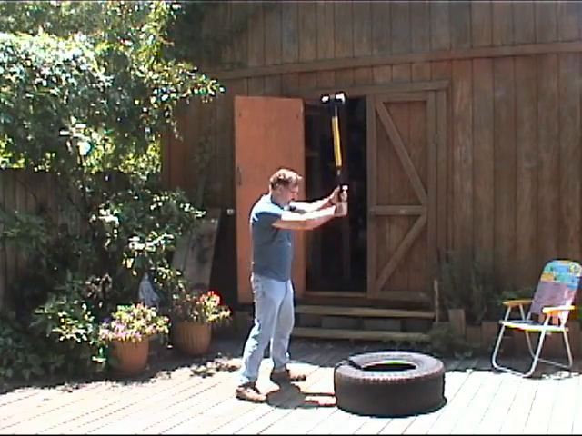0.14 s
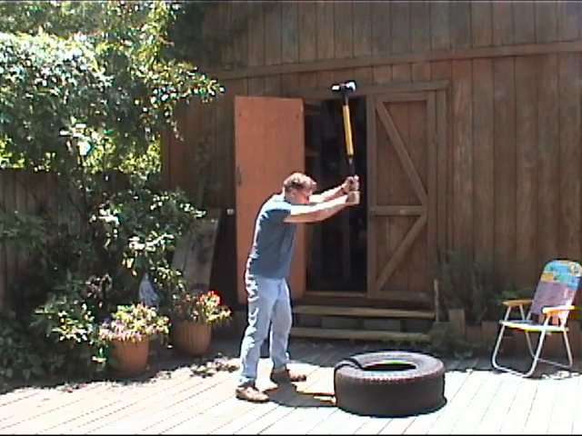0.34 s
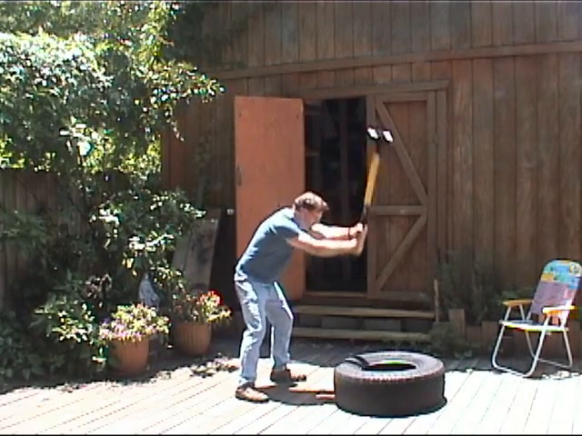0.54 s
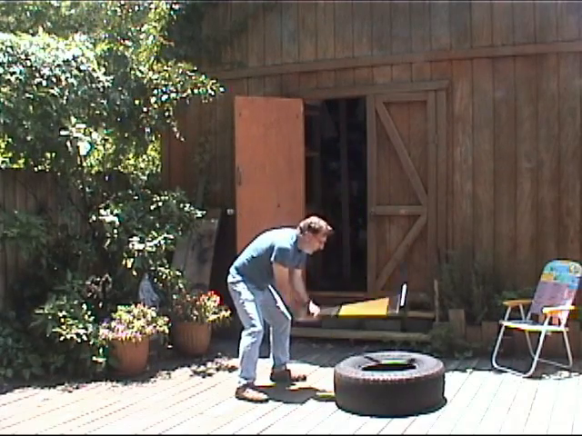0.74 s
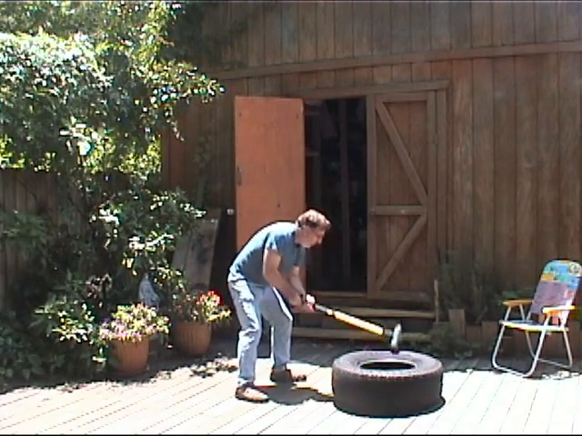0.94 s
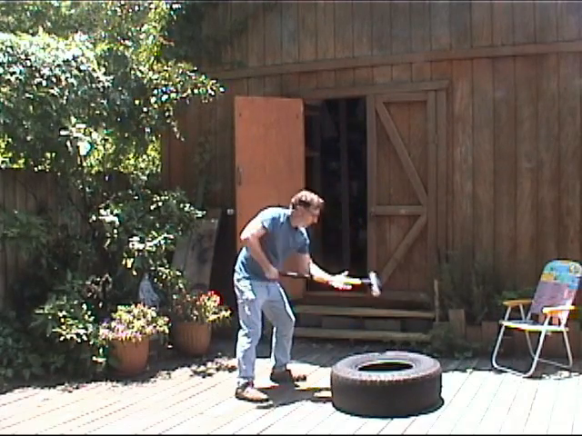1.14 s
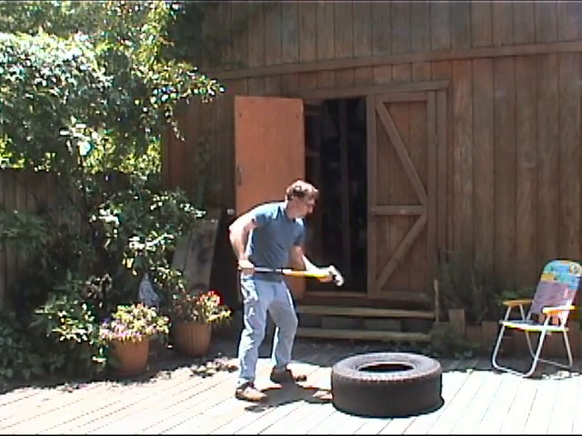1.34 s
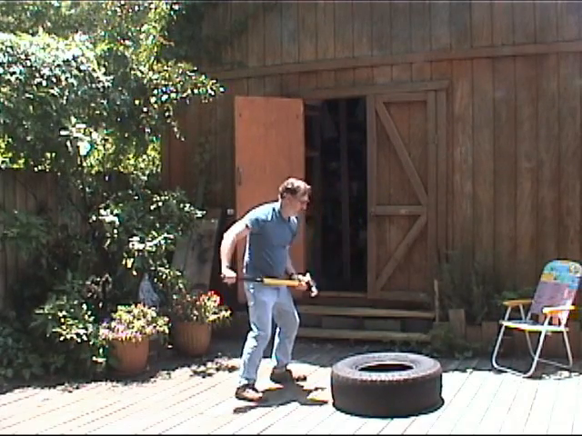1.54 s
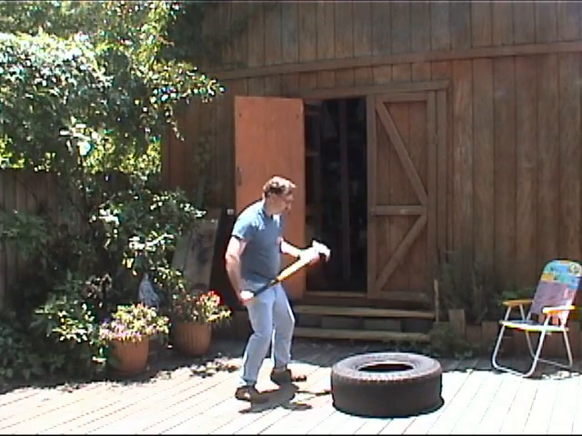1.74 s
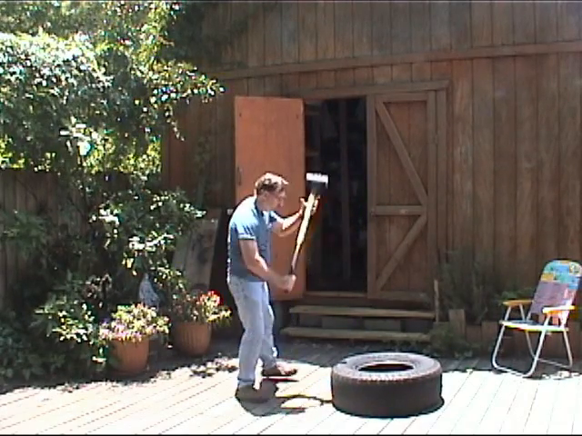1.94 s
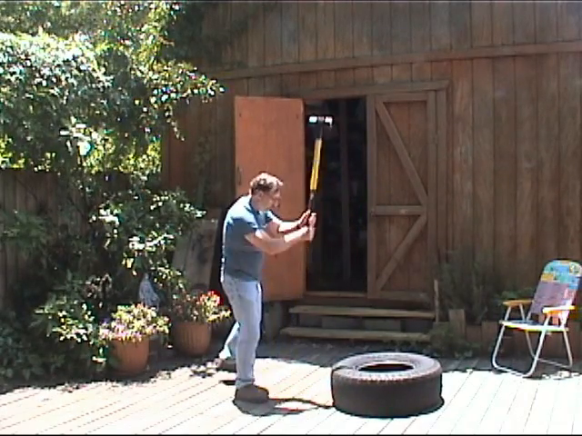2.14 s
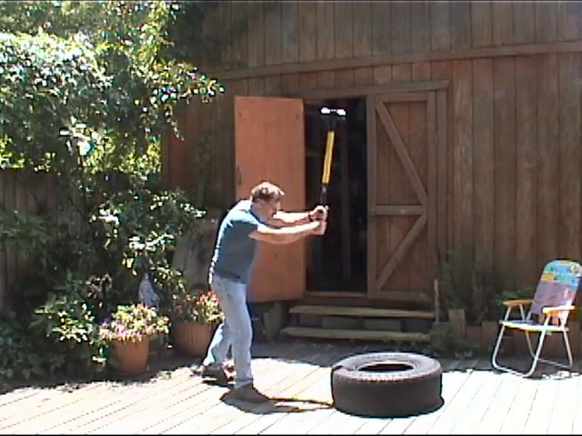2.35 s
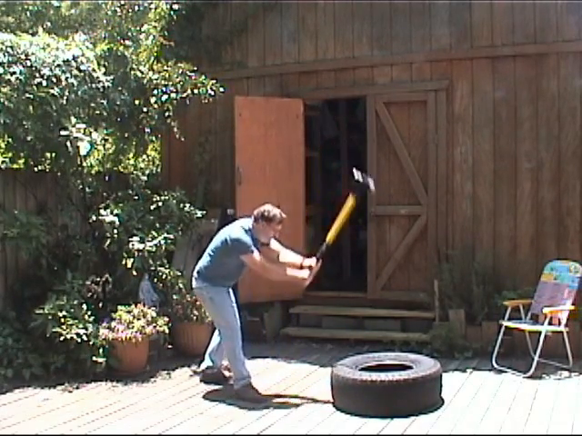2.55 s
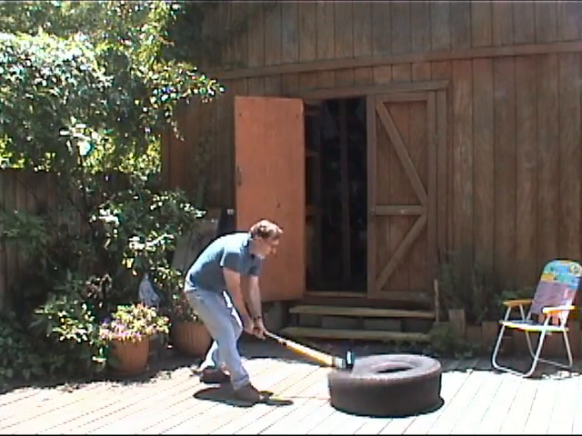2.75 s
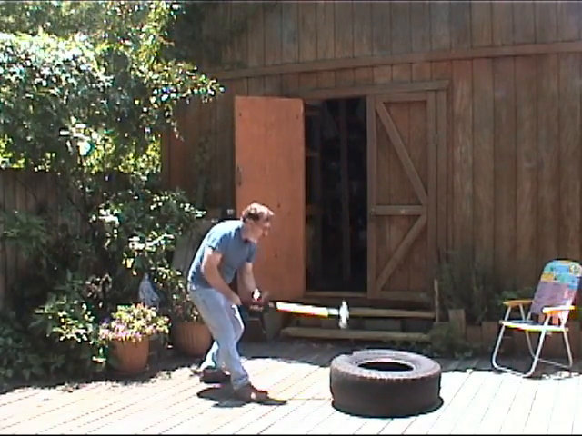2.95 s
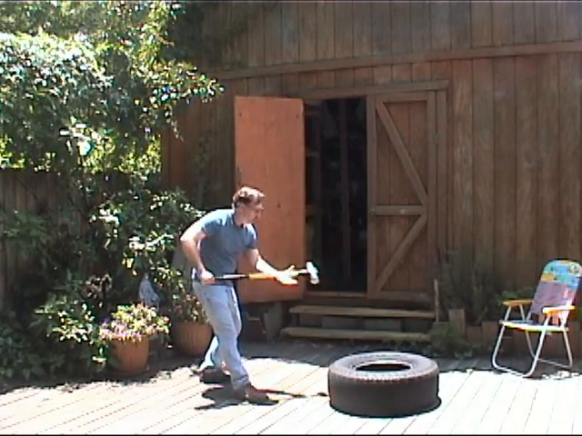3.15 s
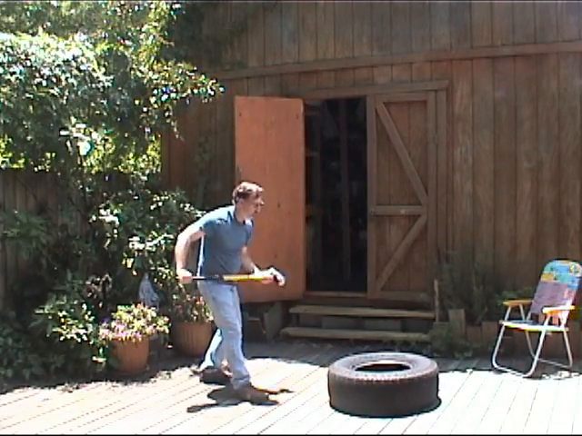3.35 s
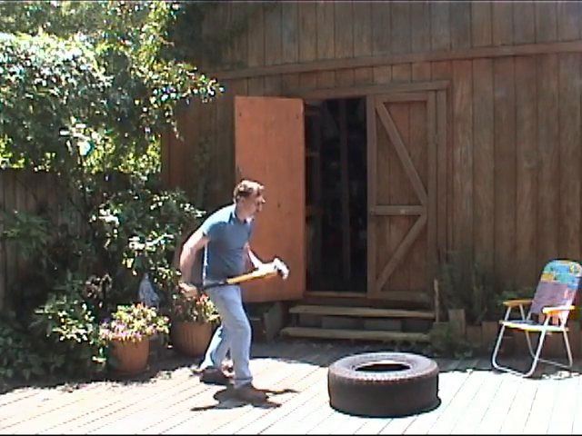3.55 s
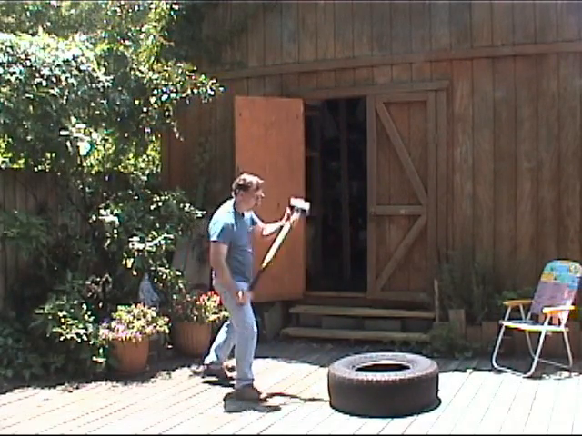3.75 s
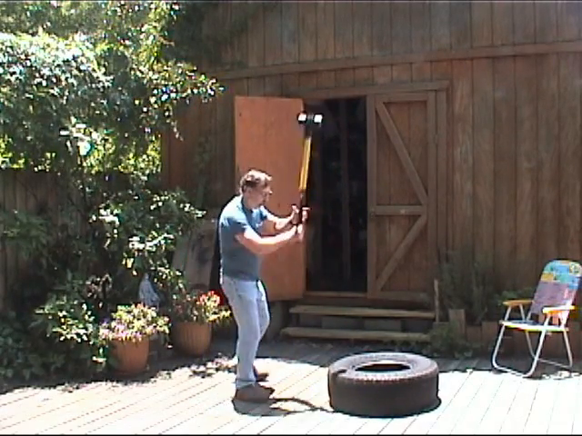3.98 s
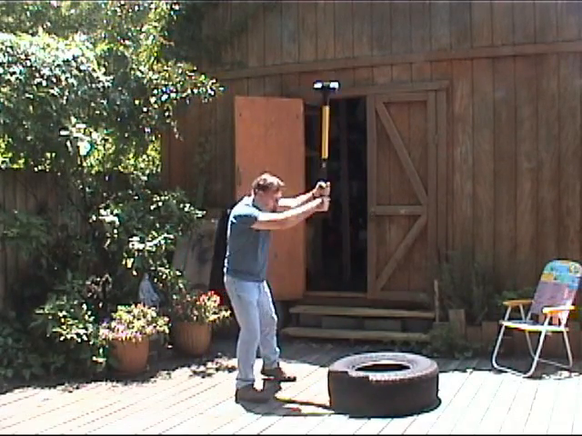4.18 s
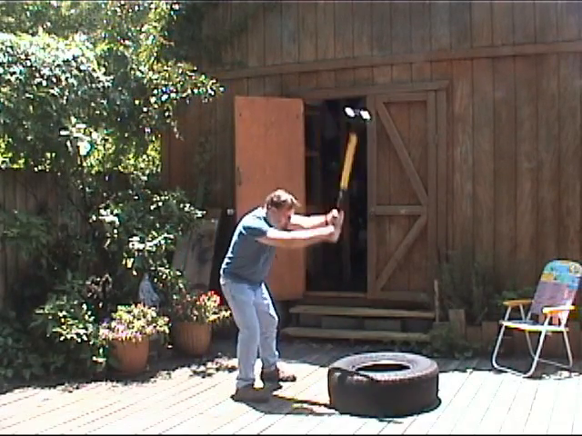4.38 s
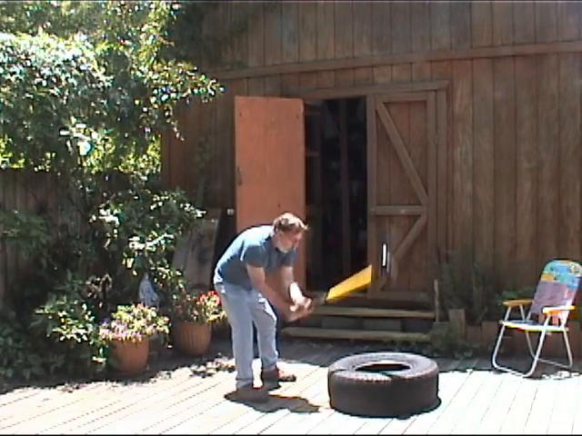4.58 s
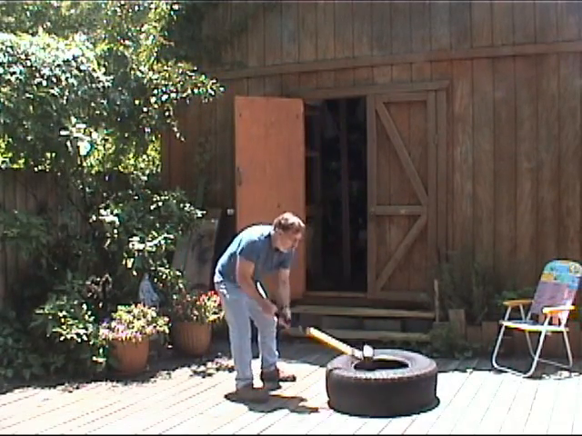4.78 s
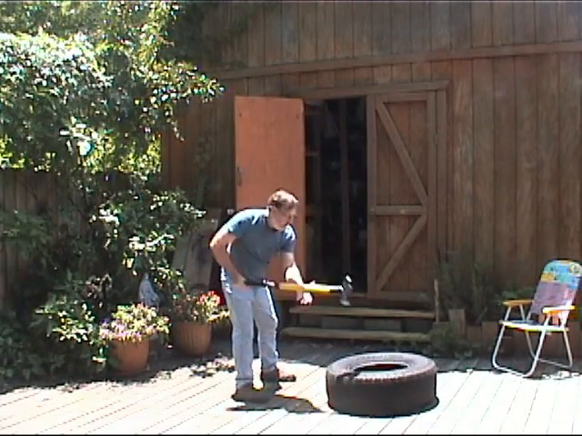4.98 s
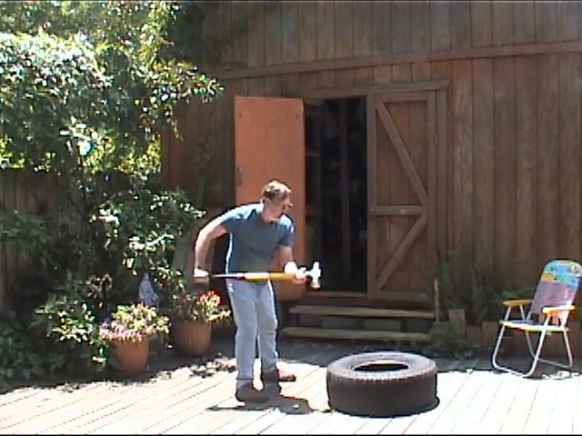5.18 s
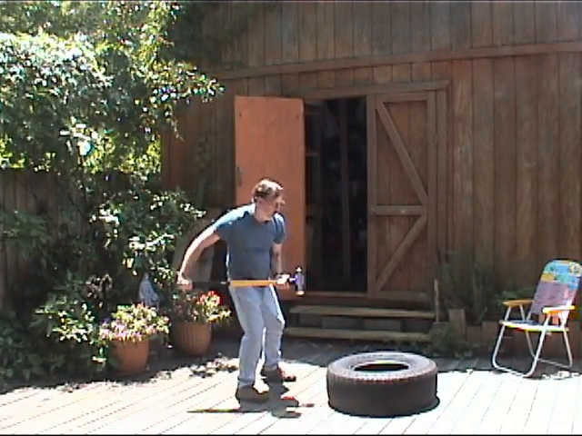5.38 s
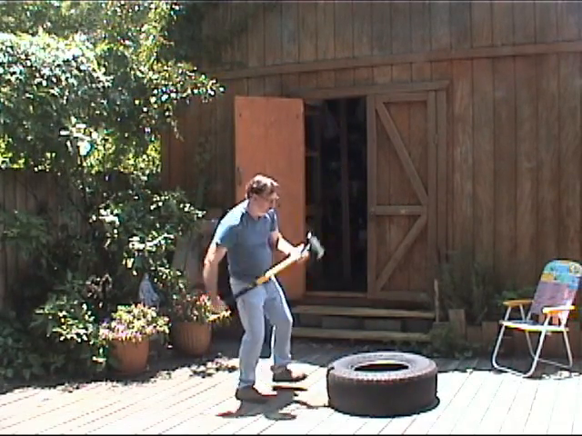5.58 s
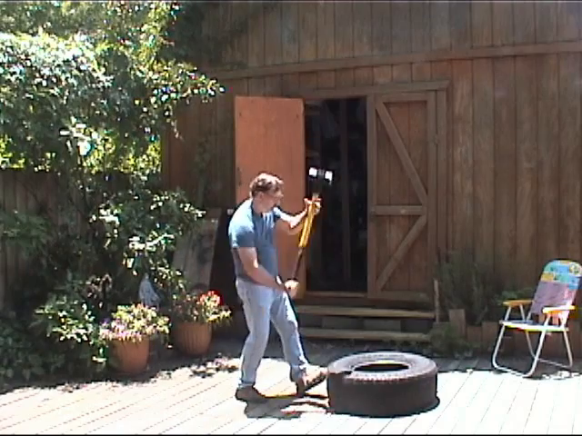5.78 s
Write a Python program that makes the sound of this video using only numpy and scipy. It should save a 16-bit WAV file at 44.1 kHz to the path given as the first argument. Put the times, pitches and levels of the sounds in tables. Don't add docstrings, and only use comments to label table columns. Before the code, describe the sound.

A sledgehammer slams a big rubber tyre on a wooden deck three times, each blow clattering and booming before a smaller knock as it drops back.

```python
import sys
import numpy as np
from scipy import signal
from scipy.fft import rfft, irfft, next_fast_len
from scipy.io import wavfile
from scipy.ndimage import uniform_filter1d, map_coordinates

SR = 44100
rng = np.random.default_rng(int(sys.argv[2]) if len(sys.argv) > 2 else 0)


def invert_db(level):
    return 10 ** (np.asarray(level, dtype=float) / 20)


def generate_wav(sig):
    pcm = np.round(np.clip(np.atleast_2d(sig).T, -1, 1) * 32767).astype(np.int16)
    wavfile.write(sys.argv[1], SR, pcm)


N = 256662


def unit(x):
    return x / np.sqrt(np.mean(x ** 2) + 1e-20)


def along(points, hz):
    point_hz, value = np.transpose(points)
    return np.interp(np.log(hz + 1), np.log(point_hz + 1), value)


def filtered(x, response):
    m = next_fast_len(x.shape[-1] + SR // 2)
    spectrum = rfft(x, m) * response(np.fft.rfftfreq(m, 1 / SR))
    return irfft(spectrum, m)[..., :x.shape[-1]]


def resonances(modes):
    def response(f):
        return sum(invert_db(db) * SR / np.pi * 1j * f / (hz * hz - f * f + 1j * f * abs(width))
                   for hz, width, db in modes)
    return response


def causal(points):
    def response(f):
        cepstrum = irfft(np.log(invert_db(along(points, f))))
        half = len(cepstrum) // 2
        folded = np.r_[cepstrum[0], 2 * cepstrum[1:half], np.zeros(len(cepstrum) - half)]
        return np.exp(rfft(folded))
    return response


def wobble(rate):
    knots = rng.standard_normal(int(N * rate / SR) + 4)
    return map_coordinates(knots, [np.arange(N) * rate / SR])


# pitch_hz, likeness (1 same, -1 opposite)
NEAR_LIKENESS = [(50, .6), (150, 1), (700, 0.91), (2000, 0.79), (5000, 0.21), (8000, -0.36), (12500, 0.61)]


def spread(noise, response, alike=NEAR_LIKENESS):
    def turn(hz):
        return np.arccos(np.clip(along(alike, hz), -1, 1)) / 2
    mid, side = filtered(noise, lambda hz: response(hz) * [np.cos(turn(hz)), np.sin(turn(hz))])
    return np.array([mid + side, mid - side])


# pitch_hz, likeness
FAR_LIKENESS = [(65, -0.19), (190, 0.81), (960, 0.75), (2400, 0.44), (6300, .05), (8400, -0.42),
                (11000, -0.3), (13800, -0.21)]


def patchy_noise(response, patchy_db):
    z = signal.stft(rng.standard_normal((2, N + 512)), nperseg=512)[2]
    field = uniform_filter1d(rng.standard_normal(z.shape[1:]), size=6, axis=0)
    field = uniform_filter1d(field, size=10, axis=1)
    noise = signal.istft(z * invert_db(patchy_db * unit(field)), nperseg=512)[1][:, :N]
    return unit(spread(noise, response, FAR_LIKENESS))


# start_s, tyre_push_db, grit_db, slap_db, crack_edge_hz
BLOWS = [
    (0.881, -21.5, -36.5, 5.5, 14000),
    (2.828, -25, -49, 7, 33000),
    (4.757, -21, -30, -6, 7700),
]
# pitch_hz, level_db (per Hz)
FLOOR = [(20, -40), (50, 6), (90, -9), (160, 5.5), (250, 0.5), (500, -1.5), (1000, -2.5), (1600, -6.5),
         (2700, -7), (3300, -10.5), (5000, -14.5), (8000, -18.5), (13300, -28), (15600, -43)]
# pitch_hz, width_hz, level_db (rms)
HUM_AND_WHINE = [(78.6, 7, -61), (118, 2.63, -54), (227.7, 2.2, -62), (1286, 3.1, -62.5), (1630, 3.08, -62),
                 (1727, 3.57, -63), (1900, 12, -66), (2640, 40, -62.5), (2704, 25, -70), (8740, 40, -76.5),
                 (9150, 40, -78.5),
                 (13400, 70, -78)]


def background():
    t = np.arange(N) / SR
    since = np.abs(t - np.array(BLOWS)[:, :1] - 0.15) / 0.15
    level_db = -44 + 3 * np.clip(1 - since, 0, 1).sum(axis=0)
    noise = patchy_noise(lambda hz: invert_db(along(FLOOR, hz)), patchy_db=1.15)
    out = invert_db(level_db + 0.057 * wobble(2.52)) * noise
    for hz, width, db in HUM_AND_WHINE:
        drift = np.cumsum(width * wobble(8 + width)) / SR
        lean_db = (hz < 200) * -2.5 * np.array([[.5], [-.5]])
        gain = invert_db(db + 3 + 1.8 * wobble(3.16) + lean_db)
        out += gain * np.sin(2 * np.pi * (hz * t + drift))
    return out


# peak_s, level_db, rise_s, fall_s
SLIDES = [
    (0.062, -42.5, 0.033, 0.065),
    (2.01, -56, .08, .03),
    (2.178, -45.5, 0.056, 0.094),
]
# pitch_hz, level_db (per Hz)
PALM = [(2350, -21), (4000, 5), (4210, 1), (10600, 4), (14500, -8), (15500, -18)]


def slides():
    t = np.arange(N) / SR
    gain = 0
    for s, db, rise, fall in SLIDES:
        away = np.maximum((s - t) / rise, (t - s) / fall)
        gain = gain + invert_db(db - 17 * away)
    return gain * invert_db(1.3 * wobble(170)) * patchy_noise(lambda hz: invert_db(along(PALM, hz)), patchy_db=1.0)


# pitch_hz, fade_s (to -60 dB)
YARD_FADE = [(100, 0.44), (500, 0.38), (1500, 0.33), (4000, 0.31), (12000, 0.3)]
# pitch_hz, level_db
WALLS = [(90, -13), (170, -3), (400, -0.5), (1000, 1), (10000, 0.5)]


def yard(x, wet_db, drive):
    hz, t, z = signal.stft(rng.standard_normal((2, SR * 3 // 4)), SR, nperseg=256)
    fading = signal.istft(z * invert_db(-60 * t / along(YARD_FADE, hz)[:, None]), SR, nperseg=256)[1]
    tail = spread(fading, lambda f: invert_db(along(WALLS, f)))
    tail = tail * (1 - np.exp(-np.arange(tail.shape[1]) / SR / 0.0037))
    tail = invert_db(wet_db) * tail / np.linalg.norm(tail[0])
    return x + signal.fftconvolve(drive[None], tail, axes=1)[:, :len(drive)]


# start_s, peak_db, ring_hz, treble_db
TICKS = [(0.1545, -41, 4880, -25), (0.445, -38, 4180, -30), (1.815, -41, 3930, -20), (2.602, -38, 3350, -5),
         (2.6834, -41, 6350, -1.5), (2.6912, -41, 3040, -3), (2.7614, -45, 4170, -4),
         (2.7925, -59, 4270, 16), (2.813, -61, 4270, 14), (3.3116, -39.5, 3000, -3.5),
         (3.4, -40, 3160, -13), (3.458, -47, 3180, -15), (3.7155, -42, 4200, -7), (3.852, -37.5, 3370, -10),
         (4.106, -24.5, 3200, -14)]


def ticks():
    out, t = np.zeros(N + SR), np.arange(SR // 20) / SR
    for s, db, hz, treble_db in TICKS:
        ring, click = rng.standard_normal((2, len(t))) * invert_db(-60 * t / 0.016)
        ring = filtered(ring, lambda f: (1j * f * hz / (hz * hz - f * f + .4j * f * hz)) ** 2)
        click = filtered(click, lambda f: (f < 14500) * (
            1j * f * 9500 / (9500 ** 2 - f * f + 1j * f * 8000)) ** 2)
        place = out[round(s * SR):][:len(t)]
        place += invert_db(db - 1.5) * ring / np.abs(ring).max()
        place += invert_db(db + treble_db + 2.0) * click / np.abs(click).max()
    return yard(out[:N], -3, out[:N])


# pitch_hz, fade_s (to -60 dB), level_db
CAVITY = [
    (265.2, 0.18, -4),
    (287.7, 0.073, -3),
]


def cavity(pump):
    t = np.arange(len(pump)) / SR
    out = 0
    for hz, t60, db in CAVITY:
        envelope = (1 - np.exp(-t / 0.0016)) * invert_db(-60 * t / t60)
        swing = signal.fftconvolve(pump, envelope)[:len(t)]
        out = out + invert_db(db) * swing * np.sin(2 * np.pi * hz * t)
    return out


# pitch_hz, width_hz, level_db
TYRE_BODY = [(100.5, 16.7, -1), (128.3, 19.4, -4.5), (163, 14.3, -10), (330, 100, -34.5)]
# pitch_hz, width_hz, level_db
BOARDS = [(520, 480, -8), (917, 880, -6), (1260, 540, -15), (2020, 640, -23)]
# pitch_hz, level_db
CRACK_TONE = [(800, -17), (1800, 3.5), (3000, 9.5), (7000, 8), (10000, 5), (13500, -0.5), (15500, -44),
              (17000, -54)]


def bounce(contacts, wet_db, rise, soft_hz, slap_db, edge_hz, crack_t60):
    start, t = round(contacts[0][0] * SR) - 200, np.arange(SR // 16) / SR
    knock, tap, push, pump, snap, *crack = np.zeros((7, SR))
    deck = np.zeros((2, SR))
    deck[0, round(.0012 * SR) + 200] = invert_db(contacts[0][1] + slap_db)
    swell = (t / rise * np.exp(1 - t / rise)) ** 1.1
    for s, db, hz, boom_db, cavity_db, crack_db in contacts:
        at = round((s + 0.001) * SR) - start
        noise = rng.standard_normal((5, len(t)))
        knock[at:][:len(t)] += invert_db(db - 3) * swell * np.sin(2 * np.pi * hz * t)
        chatter = noise[:2] * np.abs(noise[4]) ** 0.63 * (1 - np.exp(-t / rise)) * invert_db(-60 * t / 0.06)
        deck[:, at:at + len(t)] += invert_db(db - 18) * chatter
        tap[at + round(rise * SR)] += invert_db(db - 12)
        push[at] += invert_db(db + boom_db + 2)
        pump[at] += invert_db(db + cavity_db)
        for channel, hiss in zip(crack, noise[2:4]):
            channel[at:][:len(t)] += invert_db(db + crack_db + 3.5) * hiss * invert_db(-60 * t / crack_t60)
        snap[at] += invert_db(db + crack_db + 19)

    dry = knock + spread(deck, lambda f: resonances(BOARDS)(f) / (1 + 1j * f / soft_hz) ** 3)
    dry += filtered(push, lambda f: resonances(TYRE_BODY)(f) / (1 + 1j * f / 600) ** 2)
    dry += filtered(tap, lambda f: resonances([(1970, 1500, 0)])(f) / (1 + 1j * f / soft_hz) ** 3)
    air = cavity(pump)
    dry += air
    dry = filtered(dry, lambda f: (1j * f / (75 + 1j * f)) ** 3)

    def edge(f):
        return causal(CRACK_TONE)(f) / (1 + 1j * f / edge_hz) ** 2
    crack, snap = spread(np.array(crack), edge), filtered(snap, edge)
    to_walls = dry.mean(axis=0) - 0.49 * knock - 0.59 * air + snap
    return np.pad(yard(dry + crack, wet_db, to_walls), ((0, 0), (start, N)))[:, :N]


# start_s, air_db, body_db
SQUEEZES = [(0.883, -12.5, -26), (0.909, -14.5, -45), (1.016, -19.5, -27.5), (2.832, -9.5, -29),
            (2.847, -20, -30), (2.914, -30, -31), (2.961, -32, -40), (4.757, -30, -13.5), (4.775, -20, -20),
            (4.8, -10, -41)]
# start_s, level_db
CRACKS = [(0.88, -30), (0.906, -30), (0.912, -45), (0.919, -31), (2.828, -8), (2.832, -14.5), (2.847, -27),
          (4.757, -15), (4.762, -12), (4.769, -18), (4.773, -14.5)]


def contacts(hits, push_db, grit_db, pump_db, rattle_db, count):
    first, chance = hits[0][0], rng.standard_normal((count, 3))
    scatter_db, silent_db = -0.5, -90
    late = 0.028 * (np.arange(1, count + 1) + .25 * chance[:, 0])
    rattle_level = -21.5 + rattle_db - 64 * late + scatter_db * chance[:, 1]
    rattle = zip(first + late, rattle_level, 750 * np.exp(0.233 * chance[:, 2]))
    fade_db_s = np.array([127, 57, 133])
    rows = []
    for s, db, hz in [*hits, *rattle]:
        push, pump, grit = scatter_db * rng.standard_normal(3) - (s - first) * fade_db_s
        rows.append((s, db, hz, push_db + push - db, -36.5 + pump_db + pump - db, grit_db + grit - db))
    for s, air_db, body_db in SQUEEZES:
        if -.004 < s - first < .2:
            rows.append((s, silent_db, 0, body_db - silent_db, air_db - silent_db, 0))
    for s, db in CRACKS:
        if -.004 < s - first < .2:
            rows.append((s, silent_db, 0, 0, 0, db - silent_db))
    return rows


# start_s, peak_db, board_pitch_hz
CLATTER = [(0.8805, -6, 543), (0.894, -10.5, 850), (0.904, -10.5, 880), (0.914, -4.5, 938),
           (0.919, -4, 780), (0.925, -20, 870), (0.933, -11.5, 1200), (0.995, -25, 740),
           (1.064, -20.5, 820), (1.074, -21.5, 870), (1.086, -24.5, 820), (2.828, -8.5, 557),
           (2.832, -9.5, 424), (2.847, -1, 577), (2.859, -8, 450), (2.877, -16, 770), (2.891, -9.5, 1050),
           (2.901, -10.5, 880), (2.915, -4, 905), (2.941, -18.5, 890), (2.99, -26, 1060),
           (4.757, -7.5, 430), (4.761, -12, 920), (4.773, -5, 524), (4.788, -14, 646), (4.794, -9, 623),
           (4.8, -11.5, 853)]
# start_s, peak_db, board_pitch_hz
DROPS = [
    [(1.144, -17, 660), (1.149, -15, 1026), (1.153, -20, 750), (1.157, -7.5, 847), (1.168, -14.5, 590)],
    [(3.113, -31, 850), (3.117, -14.5, 870), (3.12, -7.5, 889), (3.134, -17.5, 1310)],
    [(5.022, -34, 1030), (5.026, -12.5, 1070), (5.029, -4.5, 940), (5.035, -13.5, 1336), (5.044, -16, 910),
     (5.069, -25, 830), (5.084, -26, 850)],
]


def tyre():
    out = 0
    for s, push_db, grit_db, slap_db, edge_hz in BLOWS:
        hits = [row for row in CLATTER if -.01 < row[0] - s < .5]
        rows = contacts(hits, push_db, grit_db, pump_db=0, rattle_db=0, count=6)
        out += bounce(rows, wet_db=-5, rise=0.0015, soft_hz=3700,
                      slap_db=slap_db, edge_hz=edge_hz, crack_t60=0.0077)
    for hits in DROPS:
        rows = contacts(hits, push_db=-36.5, grit_db=-47, pump_db=-4, rattle_db=-13, count=2)
        out += bounce(rows, wet_db=-8, rise=0.0015, soft_hz=2740,
                      slap_db=-24, edge_hz=10000, crack_t60=0.013)
    return out


# start_s, length_s, start_level_db
WHISTLE = [
    (1.39, .27, -59.5),
    (3.33, .17, -62),
]


def whistle():
    out, t = np.zeros(N), np.arange(N) / SR
    for s, length, db in WHISTLE:
        u = (t - s) / length
        progress = np.clip(u, 0, 1)
        level = uniform_filter1d(invert_db(db + 6 * progress) * (u > 0) * (u < 1), size=900)
        hz = 2500 + (3060 - 2500) * progress
        out += level * (1 + 0.5 * wobble(35)) * np.sin(2 * np.pi * np.cumsum(hz) / SR)
    return out


# start_s, peak_db, board_pitch_hz, grit_db
STEPS = [
    [(2.355, -32, 640, -2.5), (2.361, -31.5, 990, -7)],
    [(2.448, -27, 1430, -13), (2.456, -27, 1020, -14)],
    [(4.218, -27, 950, -11)],
]


def feet():
    out = 0
    for step in STEPS:
        rows = [(s, db, hz, -20.5, -30, grit_db) for s, db, hz, grit_db in step]
        out += bounce(rows, wet_db=-7.5, rise=0.001, soft_hz=4270,
                      slap_db=1.5, edge_hz=5400, crack_t60=0.0091)
    return out


def scene():
    return background() + slides() + ticks() + tyre() + whistle() + feet()


def low_pass(x):
    return signal.sosfilt(signal.butter(12, 16510, fs=SR, output="sos"), x)


# pitch_hz, level_db
LEAN = [(60, -2), (240, -3.5), (600, -2.3), (1200, -.6), (1600, -1.2), (5000, -1.4), (8400, -2.5),
        (13000, .4)]
# pitch_hz, lead_radians
LEAD = [(100, 0), (400, .2), (2000, .3), (4000, 0)]


def record(dry):
    side = np.array([[.5], [-.5]])
    x = filtered(dry, lambda hz: invert_db(side * along(LEAN, hz)) * np.exp(1j * side * along(LEAD, hz)))
    x = x / (1 + np.abs(x / .99) ** 4) ** (1 / 4)
    mix = filtered(x, lambda hz: hz < 16400)
    return low_pass(mix)


dry = scene()
out = record(dry)
generate_wav(out)
```